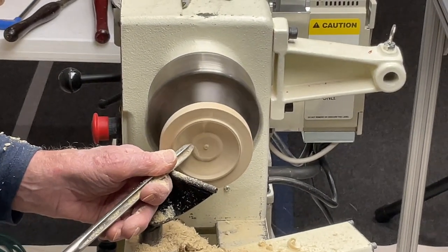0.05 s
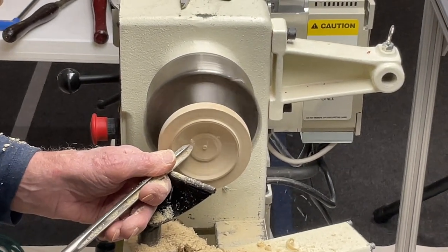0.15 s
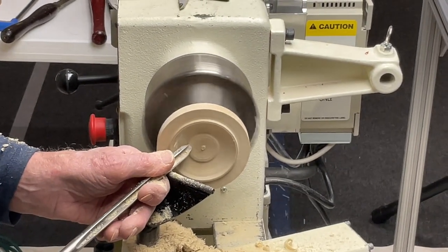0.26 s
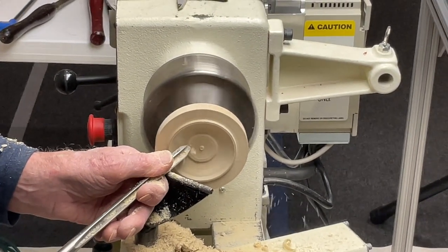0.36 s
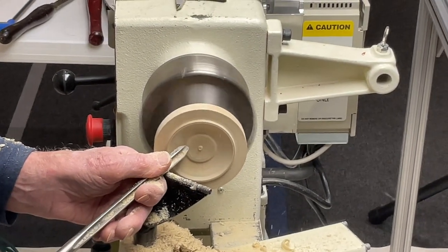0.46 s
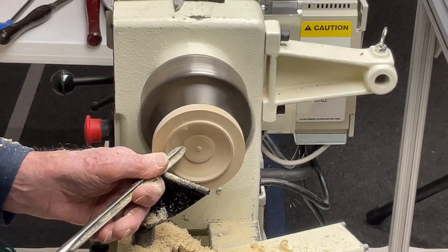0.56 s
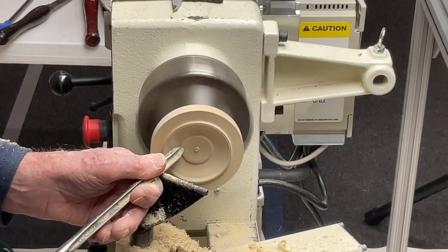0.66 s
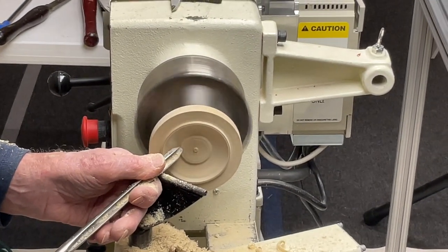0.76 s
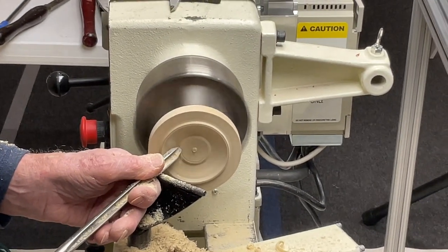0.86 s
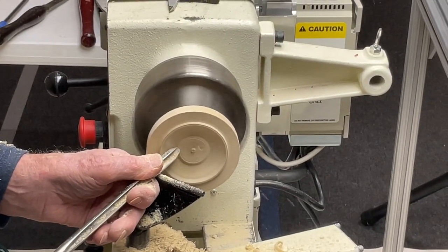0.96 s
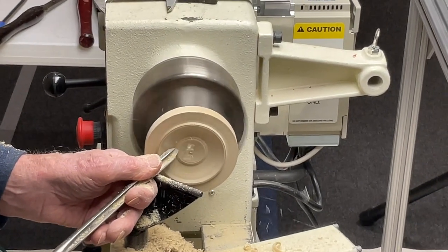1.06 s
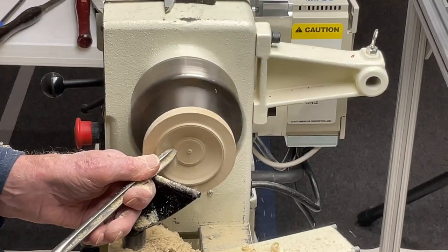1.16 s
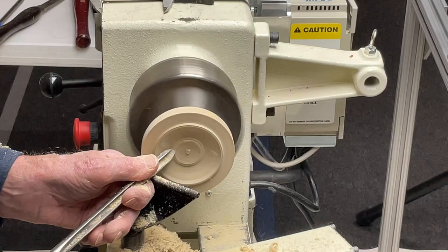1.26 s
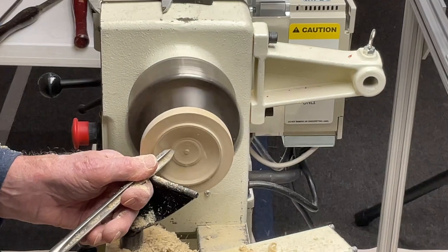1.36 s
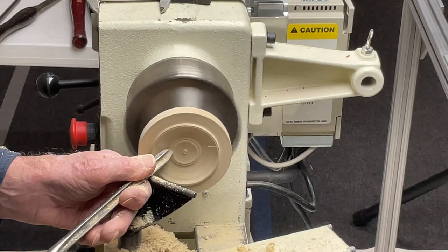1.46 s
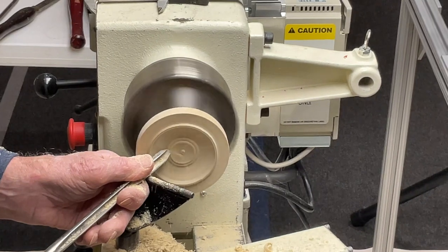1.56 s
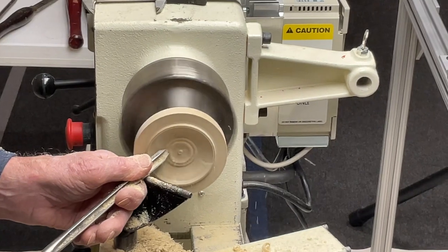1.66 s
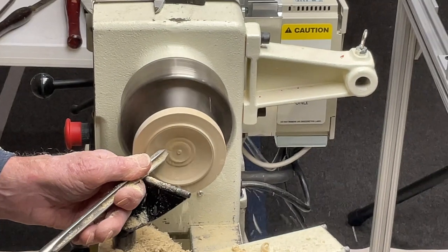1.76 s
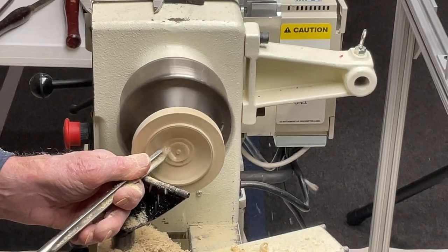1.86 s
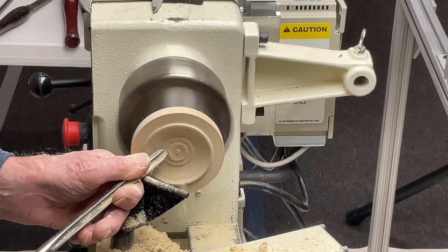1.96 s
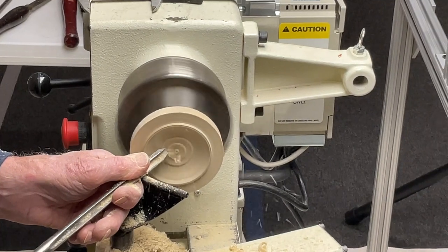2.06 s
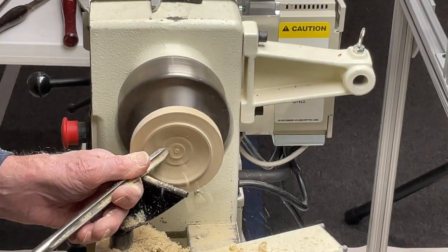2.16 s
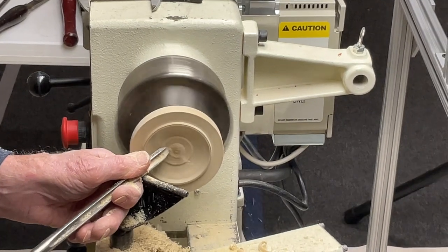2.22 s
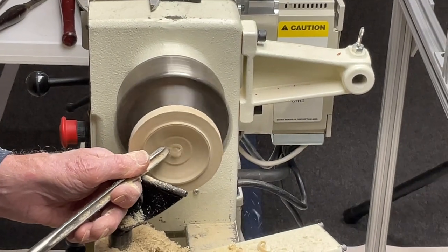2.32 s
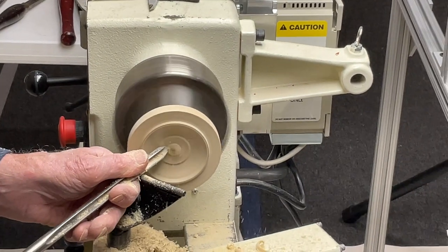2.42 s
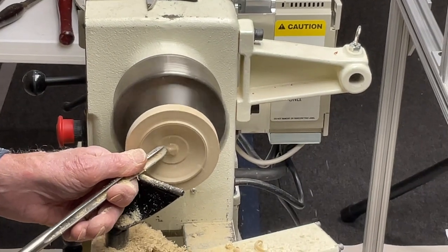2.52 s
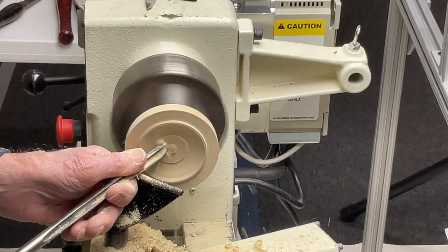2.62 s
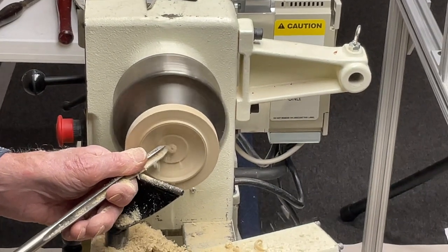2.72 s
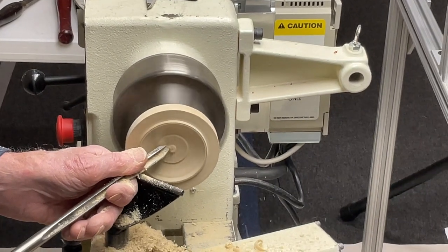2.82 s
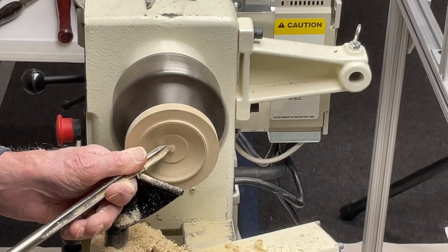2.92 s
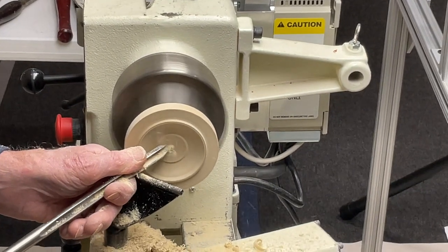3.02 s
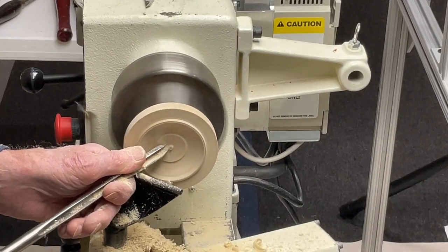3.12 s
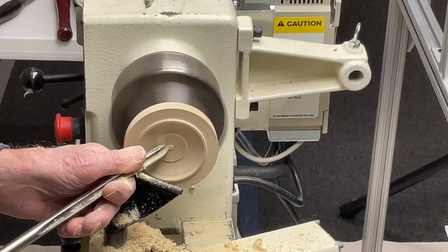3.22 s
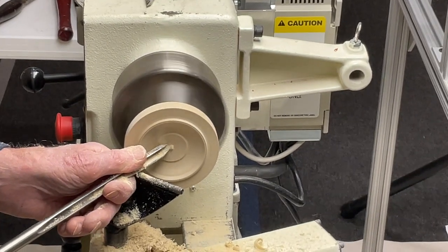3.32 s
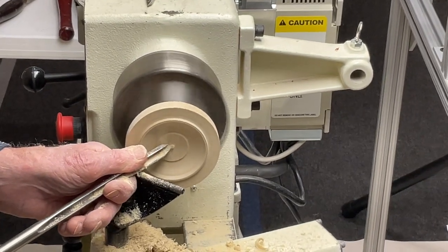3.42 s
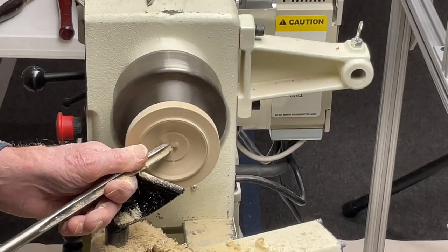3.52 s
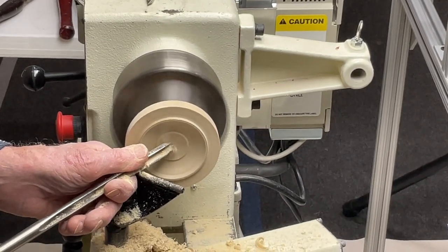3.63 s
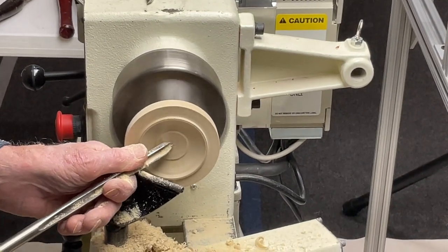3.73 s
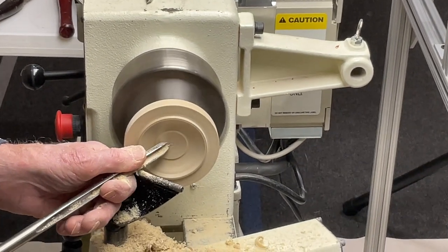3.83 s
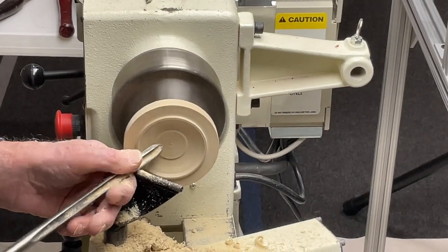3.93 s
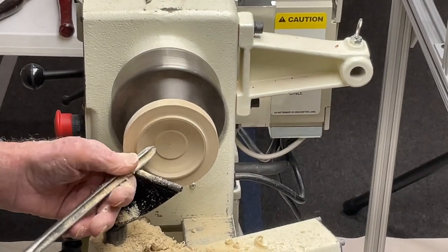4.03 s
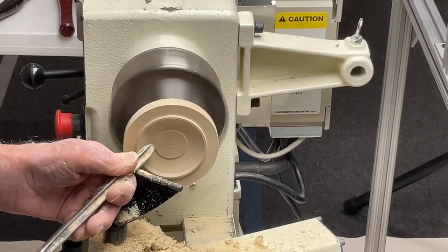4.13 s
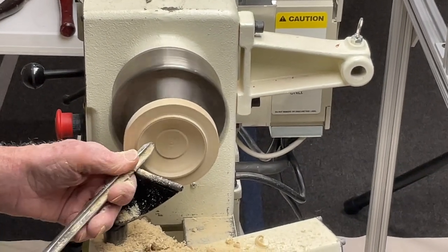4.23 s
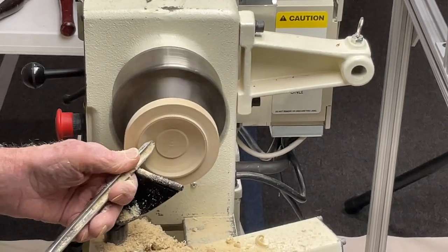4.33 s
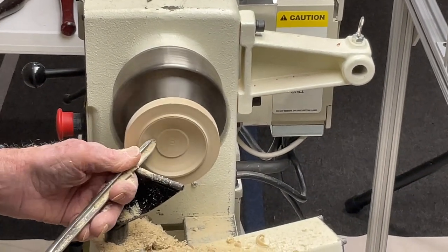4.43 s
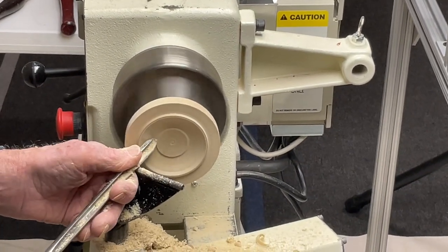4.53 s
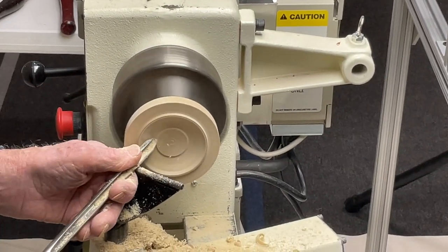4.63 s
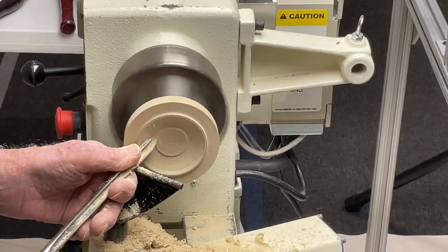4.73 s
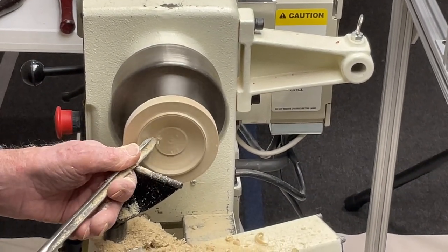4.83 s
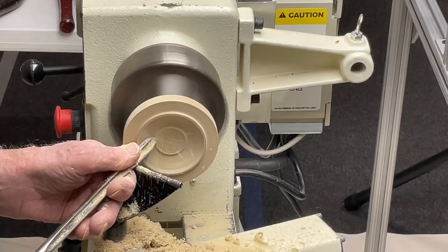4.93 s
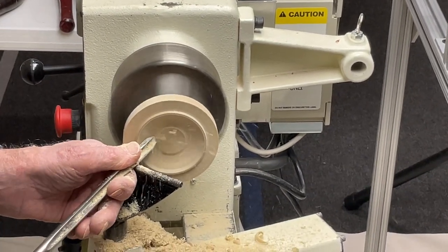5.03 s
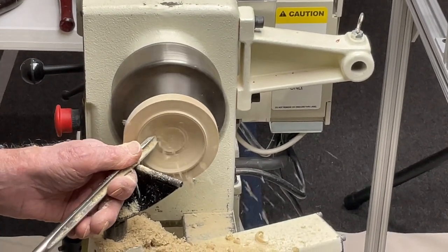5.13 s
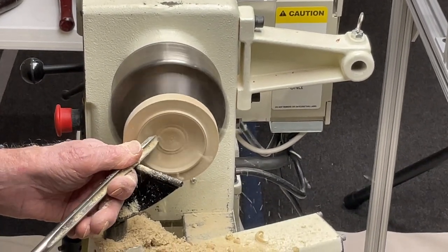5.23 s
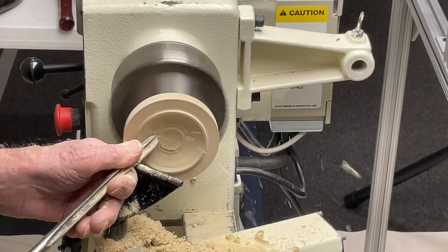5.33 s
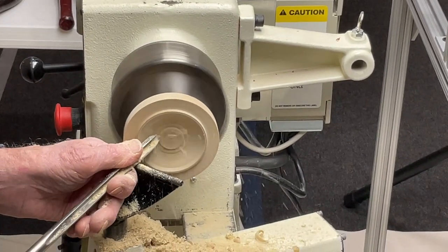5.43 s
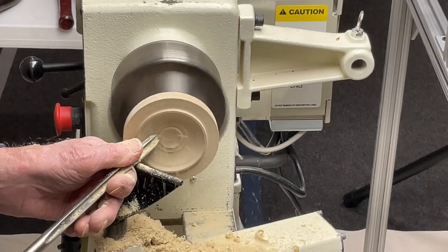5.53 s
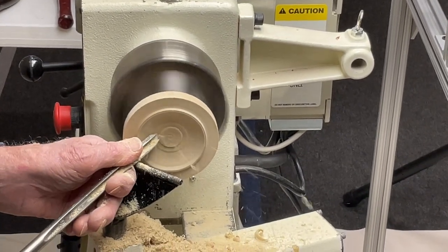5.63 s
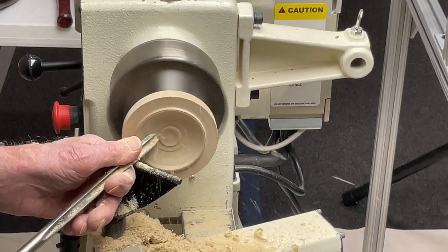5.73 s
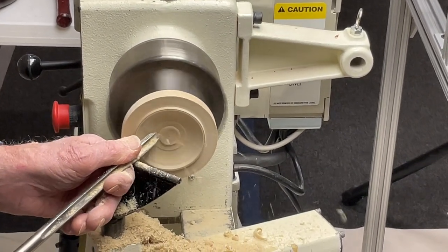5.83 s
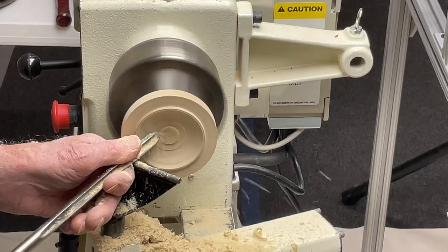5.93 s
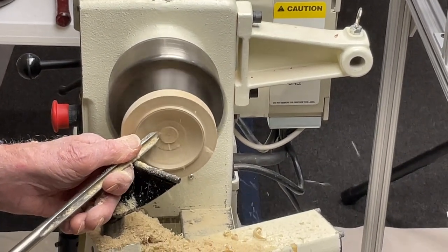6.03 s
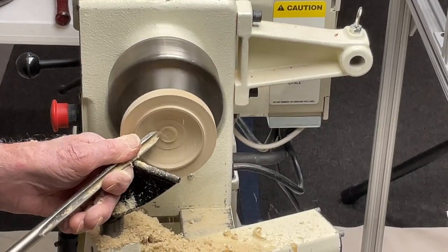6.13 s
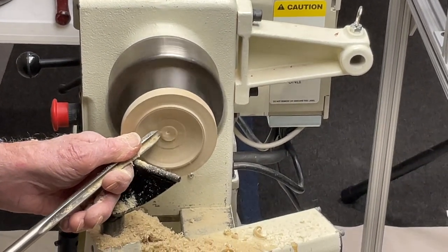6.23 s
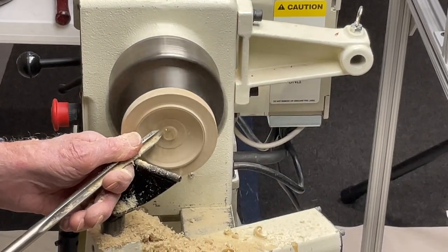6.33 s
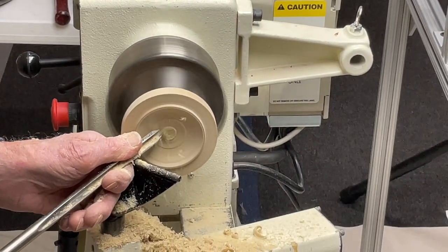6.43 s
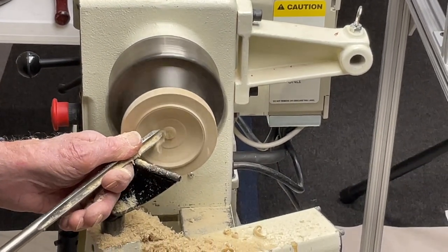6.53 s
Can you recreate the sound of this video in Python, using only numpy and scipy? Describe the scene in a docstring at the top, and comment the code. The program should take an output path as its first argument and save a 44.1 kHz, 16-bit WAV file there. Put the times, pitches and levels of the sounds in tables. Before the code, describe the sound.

Close to a small lathe in a dry workshop, a steady motor whine around 1 kHz and a soft fan rush run throughout, with a very faint high whistle. From 0 to about 0.4 s a gouge scrapes the spinning disc with a bright, metallic, rapidly pulsing squeak, about fifty bites a second, then lifts. At 0.84 s it re-enters abruptly with a brief judder; hiss and squeal continue while a woody tearing growl swells around 1.6-2.3 s and the motor labours. From 2.5 s the cut thins and fades unevenly, with low jolts and small ticks around 3.2-3.5 s. A soft low knock with a tiny bounce comes at 3.93 s, then mostly idle machine. At 4.5 s the third pass bites: a ringing judder near 4.9 s, then the loudest, roughest tearing, chatter and growl, surging from 5.2 to 6.2 s and easing slightly by 6.57 s, still cutting.

```python
"""Close to a small lathe in a workshop: a steel gouge is already cutting a spinning wooden disc and soon eases off.
A long second pass follows; as it fades the tool ticks on the wood, then knocks on its rest before a third, deep pass.
Snapping fibres, thickest where end grain comes round twice a turn, ring gouge, disc and headstock; hard spots of grain
make the gouge squeak. The motor whines underneath all along and labours with the cut, beside the rush of its fan."""
import sys
import numpy as np
from scipy import signal
from scipy.fft import rfft, irfft, next_fast_len
from scipy.io import wavfile
from scipy.ndimage import uniform_filter1d

SR = 44100
rng = np.random.default_rng(int(sys.argv[2]) if len(sys.argv) > 2 else 0)


def unload_audio(sound):
    """Save the sound as a 16-bit wav file, at the path given as the first command line argument."""
    columns = np.transpose(np.atleast_2d(sound))
    # keep every value between -1 and 1, then stretch to whole-number steps
    steps = np.round(np.clip(columns, -1, 1) * 32767)
    wavfile.write(sys.argv[1], SR, steps.astype(np.int16))


N = 289737

# All dB in the tables are levels before the small trims where the layers are mixed.
# Speed of the disc. Each row: time in seconds, spindle speed in turns per second.
SPINDLE_SPEED = [(0, 25.3), (1.7, 25.28), (2.4, 25.19), (3.2, 25.29), (6.57, 25.28)]
# Resonances of gouge and wood. Each row: centre in Hz, width in Hz, level when rubbed in dB, when cutting in dB.
GOUGE_MODES = [(1796, 450, -13, -15), (2243, 184, 6, -7.5), (2533, 260, 9.5, -1), (2860, 375, 8, 3.5),
               (3226, 150, -3, -2), (3508, 320, 8, -3.5), (3962, 297, 2, -6.5), (4514, 170, -47, -6),
               (4830, 420, -60, -12), (5740, 860, -9.5, -8), (6750, 725, -3.5, -9), (7870, 940, -16, -13),
               (8580, 1300, -77, -18.5), (9555, 280, -47.5, -11.5), (11280, 1480, -15.5, -20.5),
               (13030, 700, -11.5, -15), (14200, 500, -26.5, -25), (15600, 1600, -71.5, -22.5)]
# The gouge's loose bending modes. Each row: centre in Hz, width in Hz, level in dB.
BENDING_MODES = [(1714, 93, -7), (1811, 89, 2.5), (1842, 248, 4), (1910, 130, -11)]
# Resonances of the disc in its chuck, the two lowest first. Each row: centre in Hz, width in Hz, level in dB.
DISC_MODES = [(297.7, 56, -3), (472.5, 112, 0.5), (635, 170, -4), (744, 158, -1), (970, 290, -4),
              (1061, 60, 3.5), (1340, 500, -7.5), (1580, 330, -2)]
# Modes of the gouge that sing at each bite. Each row: pitch in Hz, wander in Hz, level in dB, lag in turns,
# change in a deep cut in dB, length of the ring as a factor, level at the second and at the third hard spot in dB.
SQUEAK_MODES = [(2520, 60, -4, .03, 2, 1.3, -3, -12), (3300, 90, -1, .04, -3, 1, -4, -16),
                (3540, 80, 5.3, .04, -3.8, 1, -2.5, -18), (5830, 130, 1.5, -.02, 0, .75, 0, -9),
                (6900, 110, -.5, -.04, 1, .75, 0, -5), (12600, 200, -10.5, 0, -1.5, 1.1, -2, -14)]
# Hard spots of grain round the disc. Each row: place in turns, half length in turns,
# share of the bite's delay that it follows.
GRAIN_SPOTS = [(-.005, .075, .3), (.45, .075, 1.2), (.73, .06, 0)]
# How hard each of those spots scrapes: one level in dB for each.
SPOT_SCRAPE_DB = [0, -2, -20]
# Where the edge sits on the disc shifts the bite. Each row: time in seconds, delay in turns.
BITE_DELAY = [(3.8, 0), (4.5, .15), (4.9, .15), (5.05, .02), (5.7, 0)]
# Passes of the gouge. Each row: edge fully in at (s), eases off at (s), out of the wood at (s), bevel rubbing in dB,
# shaving hiss in dB, shaving thins from (s), thinning in dB/s, chatter in dB, chatter dies from (s),
# rumble in dB, rumble full at (s), rumble fades from (s).
GOUGE_PASSES = [(-0.1, 0.337, 0.49, -35.5, -43, 0.018, 31.5, -53, 0.02, -69.5, 0.02, 0.4),
                (0.838, 2.524, 3.75, -34.5, -42.5, 2.18, 37.5, -33, 2.466, -41, 1.82, 2.5),
                (4.498, 6.2, 11, -32.5, -40, 5.93, 19.5, -29.5, 6.23, -47.5, 6, 7.5)]
# Depth of cut, one curve for each pass. Each row: time in seconds, level of the tearing in the disc in dB.
CUT_DEPTH = [
    [(0.0, -60), (0.266, -64.5), (0.8, -70)],
    [(0.85, -69), (1.1, -48.5), (1.28, -41.5), (1.6, -37.5), (1.7, -36), (1.97, -34), (2.43, -41.5),
     (2.85, -51.5), (3.55, -61), (3.79, -77), (3.85, -84)],
    [(4.45, -96), (4.53, -65), (4.85, -45), (4.98, -35), (5.14, -38.5), (5.18, -33), (5.29, -42),
     (5.52, -30), (5.64, -29.5), (5.77, -35.5), (5.84, -29.5), (5.95, -43), (6.02, -28.5), (6.1, -39.5),
     (6.19, -35), (6.24, -44.5), (6.41, -38.5), (6.57, -51)],
]
# The disc's low growl, one curve for each of the two deep passes. Each row: time in seconds, level in dB.
GROWL_LEVEL = [
    [(0.85, -75), (1.21, -58), (1.62, -50), (1.65, -38.5), (1.73, -43.5), (2.13, -39), (2.3, -52.5),
     (2.39, -45), (2.4, -52), (3.3, -64.5)],
    [(4.55, -70), (4.83, -58), (4.86, -48), (5.36, -43.5), (5.44, -38.5), (5.78, -42.5), (5.81, -34.5),
     (6.3, -46.5), (6.38, -38), (6.55, -49.5)],
]
# The edge digs in and jolts the headstock. Each row: centre in seconds, half length in seconds, level in dB.
HEADSTOCK_JOLTS = [(0.393, 0.028, -55), (0.969, 0.019, -50.5), (1.256, 0.026, -53), (1.414, 0.074, -49),
                   (1.654, 0.046, -41), (2.203, 0.05, -38), (2.62, 0.04, -55), (2.78, 0.056, -47),
                   (2.912, 0.032, -41.5), (3.176, 0.089, -46), (3.44, 0.02, -42.5), (3.525, 0.034, -42),
                   (3.62, 0.15, -54.5), (4.065, 0.033, -64.5), (4.963, 0.046, -56), (5.125, 0.033, -43),
                   (5.23, 0.071, -45), (5.423, 0.09, -55), (6.54, 0.031, -36.5)]
# The gouge's chatter flares up. Each row: centre in seconds, half length in seconds, level in dB.
CHATTER_FLARES = [(5.046, 0.068, -40), (5.154, 0.016, -25)]
# The gouge judders as it enters a cut. Each row: strongest at (s), level in dB, rise in dB/s, fall in dB/s.
ENTRY_JUDDERS = [(0.9, -40.5, 297, 11), (4.885, -24, 54.5, 85)]
# The edge catches (+) or skips (-) for a moment. Each row: centre in seconds, half length in seconds, change in dB.
EDGE_CATCHES = [(0.385, 0.0076, 8.5), (0.868, 0.0075, -2), (2.717, 0.02, 0.5), (2.776, 0.014, 2),
                (2.68, 0.041, 0.5), (2.805, 0.008, 0.5), (2.858, 0.0067, 2.5), (2.947, 0.017, 3.5),
                (3.03, 0.024, 0.5), (3.16, 0.015, -3), (3.28, 0.025, -8), (5.076, 0.17, 2),
                (5.137, 0.0059, -6), (5.185, 0.0052, -5.5)]
# The edge grazes the wood. Each row: centre in seconds, half length in seconds, level in dB.
GRAZES = [(0.245, 0.0026, -27), (0.841, 0.0048, -28.5), (0.882, 0.0025, -27), (2.82, 0.0025, -36),
          (3.177, 0.0035, -52.5), (3.3163, 0.0049, -38), (3.334, 0.0043, -39), (3.356, 0.01, -44),
          (3.4, 0.037, -54.5), (3.493, 0.0059, -38), (3.522, 0.025, -59)]
# The gouge is set down on the tool rest. Each row: time in seconds, level in dB.
REST_KNOCKS = [(3.9297, -29), (3.952, -43)]
# What the tool rest rings with. Each row: centre in Hz, width in Hz, level in dB.
REST_MODES = [(175, 120, -2), (326, 110, -8.5), (503, 135, 2.5), (645, 140, -8), (1900, 300, 1)]
# Colour of the headstock. Each row: frequency in Hz, level in dB.
HEADSTOCK_COLOUR = [(25, -37), (50, -31), (75, -21), (100, -2.5), (130, -4.5), (165, 1), (215, 3.5),
                    (300, -3.5), (450, -21.5), (900, -44.5), (2500, -50.5), (7000, -75)]
# Motor tones, each played at the nearest multiple of the shaft rate. Each row: frequency in Hz, level in dB.
MOTOR_TONES = [(333.8, -72.5), (759.0, -77), (963.6, -77.5), (1023, -74), (1055, -54.5), (1082, -58.5),
               (1114, -76.5), (1174, -64), (1206, -65), (1276, -78.5), (1324, -65), (1357, -70),
               (1416, -69.5), (1443, -60), (1475, -75), (1567, -83), (1642, -69), (1755, -71)]
# The load on the motor surges for a moment. Each row: centre in seconds, half length in seconds, rise in dB.
LOAD_SURGES = [(1.35, 0.14, 1.5), (1.79, 0.08, 14), (2.17, 0.08, 12), (5.06, 0.023, 5), (5.7, 0.16, 14)]
# The speed controller's whistle. Each row: frequency in Hz, level in dB.
CONTROLLER_TONES = [(8608, -93), (9932, -82.5), (10051, -82), (10174, -81), (11133, -86.5), (11256, -97),
                    (11375, -84.5)]
# Colour of the idling machine. Each row: frequency in Hz, level in dB.
IDLE_COLOUR = [(30, -32), (100, -4), (170, -6), (330, -1.5), (780, -1.5), (1300, 3), (1800, -8.5),
               (2400, -9), (4400, -17), (7500, -29), (12000, -27.5), (15000, -43)]
# Phase between the two microphone ports. Each row: frequency in Hz, lead of the left in radians.
PORT_LEAD = [(200, 0), (430, -.2), (800, .7), (1250, .7), (2000, -1.3), (2400, -2.45), (2700, -3.0),
             (2980, -3.28), (3400, -4.7), (3800, -5.7), (4400, -6.15), (5250, -5.5), (6300, -6.15),
             (7300, -5.1), (8400, -6.28), (11000, -6.28), (12600, -6.65), (15600, -6.4)]
# Level between the two microphone ports. Each row: frequency in Hz, left minus right in dB.
PORT_LEVEL = [(380, -0.5), (700, 2), (1300, 2), (1800, 4), (2400, 0.3), (2850, 0)]

T = np.arange(N) / SR
SIZE = 2 * next_fast_len(N // 2 + 8192)  # transform length, with room for the tails
FREQ = np.maximum(np.fft.rfftfreq(SIZE, 1 / SR), 1)

FIRST_END_GRAIN_S = 0.0087
ATTACK_DB_PER_S, CHATTER_BUILD_S, CHATTER_FADE_DB_PER_S = 1092.5, 0.14, 35.5
RUB_BUILD = 0.78  # share of the chatter's slow build-up that the rubbing follows
RUMBLE_RISE_DB_PER_S, RUMBLE_FADE_DB_PER_S = 33, 29
# the hand lets go slowly at first, then faster: fall until the edge is out, and the power of that curve
LIFT_DB, LIFT_POWER = 43, 1.22
# nearer the centre the tearing gets duller and the cut loses leverage on the motor:
# time from rim to centre, dulling on the way (dB per octave), share of leverage lost
TRAVEL_S, DULLING_DB, LEVERAGE_LOSS = 1.17, 11.5, 0.39
JUDDER_HZ = 1860
TICK_TILT_DB, TICK_GRIT_DB = -12.5, -7  # slope of the chirp per octave, grit against chirp
KNOCK_SOFT_HZ = 1000  # the soft contact excites little above this
MOTOR_HZ = 30.11  # shaft turns per second
# depth at which the motor runs free, dB of load per dB of depth, share by which the load wavers
FREE_RUN_DB, LOAD_SLOPE, LOAD_WAVER = -73, 0.63, 0.18
FULL_LOAD_DB = 15  # ceiling before the surges and the waver
IDLE_DB = -63.5
DIP_HZ, DIP_WIDTH_HZ = 2840, 510  # centre and width of a dip in the colour of the reflections
TOP_HZ = 15800


def cutting():
    """Bevel, shaving, chatter and judder sound at the edge; a deep cut shakes disc and headstock too."""
    rub_db, hiss_db, chatter_db, rumble_db = passes()
    tear_db = cut_depth()
    growl_db = np.interp(T, *np.vstack(GROWL_LEVEL).T)
    turn = np.cumsum(np.interp(T, *np.transpose(SPINDLE_SPEED))) / SR - FIRST_END_GRAIN_S * SPINDLE_SPEED[0][1]
    late = turn - bite_lag()
    contact = np.clip((rub_db + 82.5) / 12, 0, 1)
    # a light cut only catches the high spots; a deep one stays in the wood all the way round
    depth = np.clip((tear_db + 67.0) / 18, 0, 1)
    shaving = np.clip((hiss_db + 61.5) / 6, 0, 1) * depth
    bite = hard_spots(turn, SPOT_SCRAPE_DB, between_db=-4 + 4 * shaving, ragged_db=1.2, stretch=1.2)
    drag = end_grain(late - .3, twice_db=0.1, once_db=0.5, ragged_db=1.4)
    snapping = drag * (fibres(1100, 3.1, 0.31) + apart(0.32))

    edge = bevel_rub(bite, turn, shaving) * undb(rub_db - 1.44)
    edge = edge + shaving_hiss(bite) * undb(hiss_db - 3.0)
    edge = edge + gouge_chatter(late, depth) * undb(chatter_db - 3.0)
    edge = edge + judder(late - .03)
    disc = disc_tear(snapping) * undb(tear_db - 1.0) + contact * disc_growl(snapping) * undb(growl_db + 1.5)
    wood_and_tool = (contact * edge + disc) * undb(bumps(EDGE_CATCHES))
    return wood_and_tool + headstock_rumble(drag) * undb(rumble_db - 2.0)


def bevel_rub(bite, turn, shaving):
    """Friction excites the rubbed gouge; a lightly riding bevel sings more than it scrapes."""
    band = (5500, 7200)
    modes = np.array(GOUGE_MODES, float)[:, [0, 1, 2]]
    scrape = unit(ring(bite * fibres(9000, 1.7, 0.84), resonances(modes)), band)
    scrape = unit(shifting(scrape, [2300, 2850, 3500, 6000, 9000, 12500], depth_db=2.6, rate=50), band)
    song = unit(squeaks(turn, shaving, ragged_db=1.5), band)
    singing = .85 - .08 * shaving  # share of the power
    return np.sqrt(1 - singing) * scrape + np.sqrt(singing) * song


def squeaks(turn, shaving, ragged_db):
    """Each bite sets the gouge's modes singing briefly, each at its own moment, pitch and strength."""
    out = 0
    for hz, wander_hz, db, lag, deep_db, stretch, *later_db in SQUEAK_MODES:
        catch = hard_spots(turn - lag - .018 * walk(40), [0, *later_db], between_db=-21 + 5 * shaving,
                           ragged_db=1.4, stretch=stretch)
        level_db = db + deep_db * shaving + ragged_db * walk(75)
        out = out + catch * undb(level_db) * sing(hz, wander_hz)
    return out


def sing(hz, wander_hz):
    """One mode of the gouge, its pitch wandering with the contact."""
    pitch_hz = hz + wander_hz * (.8 * walk(90) + .5 * walk(500))
    return np.sin(2 * np.pi * np.cumsum(pitch_hz) / SR)


def shaving_hiss(bite):
    """Fibres snapping as the shaving comes off ring the cutting gouge."""
    band = (8200, 9700)
    modes = np.array(GOUGE_MODES, float)[:, [0, 1, 3]]
    hiss = unit(ring(bite * fibres(6000, 2.8, 0.79), resonances(modes)), band)
    return unit(shifting(hiss, [2500, 4500, 7000, 9500, 13000], depth_db=1.7, rate=70), band)


def gouge_chatter(late, depth):
    """The gouge springs back after each bite and rings its loose bending modes."""
    rebound = end_grain(late - .12, twice_db=7.5 - 5 * depth, once_db=.5, ragged_db=1.6)
    push = rebound * (fibres(2500, 0.9, 0.83) + apart(0.33))
    return unit(ring(push, resonances(BENDING_MODES)), band=(1700, 2000))


def judder(turn):
    """The gouge bounces in the cut: its main bending mode rings in one clean burst after each bite."""
    levels = [db - rise * np.maximum(s - T, 0) - fall * np.maximum(T - s, 0) for s, db, rise, fall in ENTRY_JUDDERS]
    bursts = end_grain(turn, twice_db=10, once_db=2, ragged_db=1, sharp=.05)
    hz = JUDDER_HZ + 12 * walk(110) + 22 * walk(600)
    tone = np.sqrt(2) * np.sin(2 * np.pi * np.cumsum(hz) / SR)
    return undb(np.max(levels, axis=0)) * bursts * tone


def disc_tear(snapping):
    """Fibres tear and ring the disc's upper modes, duller towards its centre."""
    slope_db = DULLING_DB * (.52 - inward())
    tear = ring(snapping, resonances(DISC_MODES[2:]) * no_bass())
    tear = shifting(tear, [600, 800, 1060, 1500], depth_db=2.8, rate=14, slope_db=slope_db)
    return unit(tear, band=(420, 950))


def disc_growl(snapping):
    """The disc's two lowest modes growl with a strength of their own."""
    growl = ring(snapping, resonances(DISC_MODES[:2]) * no_bass())
    return unit(shifting(growl, [285, 470], depth_db=2.8, rate=14), band=(420, 950))


def no_bass():
    """The small disc radiates hardly any bass."""
    return 1 / (1 + (210 / FREQ) ** 4)


def headstock_rumble(drag):
    """The drag of the cut shakes the headstock, which answers in the bass."""
    shake = drag * (fibres(300, 2.7, 0.43) + apart(0.1))
    return unit(ring(shake, undb(along(HEADSTOCK_COLOUR))), band=(80, 260))


def hard_spots(turn, strengths_db, between_db, ragged_db, stretch=1):
    """Pressure on the edge: each hard spot strikes it quickly and lets go more slowly, never twice alike."""
    bite, shift = undb(between_db), bite_lag()
    for (place, half, follows), db in zip(GRAIN_SPOTS, strengths_db):
        off = (turn - place - follows * shift + .5) % 1 - .5  # turns from the spot
        width = half * np.where(off < 0, .7, 1.25 * stretch)
        bite = bite + undb(db + ragged_db * walk(50)) * np.exp(-(off / width) ** 2)
    return bite / np.sqrt(uniform_filter1d(bite ** 2, SR // 8))


def end_grain(turn, twice_db, once_db, ragged_db, sharp=0.61):
    """Bite of the edge: end grain comes round twice a turn, one side harder, never quite alike."""
    angle = 2 * np.pi * turn
    both_db = twice_db * (np.cos(2 * angle) + sharp * np.cos(4 * angle))
    bite = undb(both_db + once_db * np.cos(angle) + ragged_db * walk(170))
    return bite / np.sqrt(uniform_filter1d(bite ** 2, SR // 8))


def fibres(per_s, spread_db, smooth):
    """Snapping fibres of uneven size over a share of smooth friction."""
    size = undb(spread_db * np.minimum(rng.exponential(size=N), 4))
    snaps = (rng.random(N) < per_s / SR) * rng.choice([-1, 1], N) * size
    return snaps / np.std(snaps) + smooth * rng.standard_normal(N)


def shifting(x, centres_hz, depth_db, rate, slope_db=0):
    """The contact point wanders, so each resonance group flares and fades alone; slope (dB/octave) tilts them."""
    spectrum, out = rfft(x, SIZE), 0
    for hz, weights in zip(centres_hz, np.eye(len(centres_hz))):
        group = irfft(spectrum * np.interp(FREQ, centres_hz, weights))[..., :N]
        gain_db = depth_db * walk(rate) + slope_db * np.log2(hz / centres_hz[0])
        out = out + group * undb(gain_db)
    return out


def passes():
    """Levels in dB of bevel, shaving, chatter and rumble: each builds up, holds and falls away."""
    layers = []
    for (touch_s, ease_s, out_s, rub_db, hiss_db, thin_s, thinning,
         chatter_db, dies_s, rumble_db, full_s, fades_s) in GOUGE_PASSES:
        lift_db = -LIFT_DB * np.maximum((T - ease_s) / (out_s - ease_s), 0) ** LIFT_POWER
        build_db = 20 * np.log10(1 - .9 * np.exp(-np.maximum(T - touch_s, 0) / CHATTER_BUILD_S))
        shake_db = -RUMBLE_RISE_DB_PER_S * np.maximum(full_s - T, 0)
        layers.append([rub_db + stroke(touch_s, ease_s, 0) + lift_db + RUB_BUILD * build_db,
                       hiss_db + np.minimum(stroke(touch_s, thin_s, thinning), 1.64 * lift_db),
                       chatter_db + build_db + stroke(touch_s, dies_s, CHATTER_FADE_DB_PER_S),
                       rumble_db + shake_db + stroke(touch_s, fades_s, RUMBLE_FADE_DB_PER_S)])
    rub, hiss, chatter, rumble = np.max(layers, axis=0)
    return rub, hiss, swells(chatter, CHATTER_FLARES), swells(rumble, HEADSTOCK_JOLTS)


def stroke(touch_s, ease_s, fall_db_per_s):
    """Envelope in dB: the edge goes in quickly, holds, then falls away."""
    return -ATTACK_DB_PER_S * np.maximum(touch_s - T, 0) - fall_db_per_s * np.maximum(T - ease_s, 0)


def cut_depth():
    """Depth of cut through all passes, as a level in dB."""
    return np.interp(T, *np.vstack(CUT_DEPTH).T)


def bite_lag():
    """Delay of the bite in turns."""
    return np.interp(T, *np.transpose(BITE_DELAY))


def inward():
    """How far the edge has travelled in the current pass: 0 at the rim, 1 at the centre."""
    share = np.zeros(N)
    for touch_s, *_ in GOUGE_PASSES:
        share = np.where(T >= touch_s, (T - touch_s) / TRAVEL_S, share)
    return uniform_filter1d(np.clip(share, 0, 1), size=SR // 20)


def ticks():
    """The edge grazes the wood: a brief chirp of the gouge's modes with a little grit."""
    band = (3000, 15000)
    touch = sum(undb(db) * np.exp(-((T - s) / half_s) ** 2) for s, half_s, db in GRAZES)
    chirp = 0
    for hz, wander_hz, db, *_ in SQUEAK_MODES[2:]:
        tilt_db = TICK_TILT_DB * np.log2(hz / SQUEAK_MODES[2][0])
        chirp = chirp + undb(db + tilt_db + 4.5 * walk(120)) * sing(hz, wander_hz)
    body = resonances(np.array(GOUGE_MODES, float)[:, [0, 1, 3]])
    grit = ring(fibres(5400, 2.2, 0.8), body * FREQ / (FREQ + 6000))
    return touch * (unit(chirp, band) + undb(TICK_GRIT_DB) * unit(grit, band))


def knocks():
    """The gouge lands softly on the tool rest and bounces once; each push rings the rest."""
    push = np.zeros(N)
    for s, db in REST_KNOCKS:
        push[int(s * SR)] = undb(db)
    body = resonances(REST_MODES) / (1 + (90 / FREQ) ** 2) / (1 + (FREQ / KNOCK_SOFT_HZ) ** 4)
    return ring(push, body) / abs(ring(np.ones(1), body)).max()


def motor():
    """Shaft harmonics beat once a turn, evenly when idle; under load the main whine swells and all tones waver."""
    load_db = LOAD_SLOPE * (1 - LEVERAGE_LOSS * inward()) * np.maximum(cut_depth() - FREE_RUN_DB, -8)
    load_db = np.minimum(load_db, FULL_LOAD_DB) + bumps(LOAD_SURGES)
    waver_db = .7 + 2.3 * np.clip((load_db - 5) / 12, 0, 1)
    load_db = load_db * (1 + LOAD_WAVER * walk(7))
    angle = 2 * np.pi * np.cumsum(MOTOR_HZ * (1 + 0.0002 * walk(7.1))) / SR
    out = 0
    for hz, db in MOTOR_TONES:
        main = np.exp(-((hz - 1060) / 60) ** 2)  # near 1 for the main whine
        swell_db = (0.57 + 0.15 * main) * load_db + 2.7 * main - 3.5
        # each tone away from the main whine starts at its own phase; all drift slightly
        start = (1 - main) ** 2 * rng.uniform(-np.pi, np.pi)
        drift = .07 * waver_db * walk(15)
        tone = np.sin(np.round(hz / MOTOR_HZ) * angle + start + drift)
        out = out + undb(db + swell_db + waver_db * walk(12)) * tone
    return out


def controller():
    """The speed controller whistles high up on steady tones that waver in level and phase."""
    out = 0
    for hz, db in CONTROLLER_TONES:
        level = undb(db + 1.5 + 2.2 * walk(8.1))
        out = out + level * np.sin(2 * np.pi * hz * T + 0.885 * walk(40))
    return out


def fan():
    """Soft rush of the motor's fan and bearings: coloured noise, partly different at each port."""
    air = rng.standard_normal(N) + apart(0.16)
    rush = unit(ring(air, undb(along(IDLE_COLOUR))), band=(450, 950))
    return undb(IDLE_DB - 6.0 + 0.56 * walk(7.6)) * rush


def workshop(x, t60_s, wet_db, treble_hz):
    """Dense reflections from bench and walls: decaying noise, different at each port, weak in the deep bass."""
    tails = rng.standard_normal((2, N)) * undb(-60 * T / t60_s) * (T > .002)
    tails /= np.sqrt(np.sum(tails ** 2, axis=1, keepdims=True))
    colour = FREQ / np.hypot(FREQ, 450) / (1 + (FREQ / treble_hz) ** 2)
    colour = colour * (1 - .85 * np.exp(-((FREQ - DIP_HZ) / DIP_WIDTH_HZ) ** 2))
    return undb(wet_db) * irfft(rfft(x, SIZE) * rfft(tails, SIZE) * colour)[:, :N]


def ports(x):
    """The direct sound reaches the two ports with a different phase and level."""
    half = .5j * along(PORT_LEAD)
    tilt = undb(along(PORT_LEVEL) / 2)
    return irfft(rfft(x, SIZE) * np.array([tilt * np.exp(half), np.exp(-half) / tilt]))[:, :N]


def apart(share):
    """The part of a wide source that each port hears on its own."""
    return share * rng.standard_normal((2, N))


def undb(db):
    """Decibels to gain."""
    return 10 ** (np.asarray(db) / 20)


def along(points):
    """Join (Hz, value) points on a log-frequency axis."""
    hz, value = np.transpose(points)
    return np.interp(np.log(FREQ), np.log(hz), value)


def resonances(modes):
    """Gain of a set of steep (Hz, width, dB) resonances, added in power."""
    return np.sqrt(sum((undb(db) / (1 + (2 * (FREQ - hz) / width) ** 2)) ** 2 for hz, width, db in modes))


def ring(x, gain):
    """Pass x through the causal minimum-phase filter that has this gain."""
    cepstrum = irfft(np.log(gain + 1e-7))
    cepstrum[1:SIZE // 2] *= 2  # fold the past onto the future
    cepstrum[SIZE // 2 + 1:] = 0
    return irfft(rfft(x, SIZE) * np.exp(rfft(cepstrum)))[..., :N]


def unit(x, band):
    """Scale x to rms 1 within a band (Hz, Hz)."""
    inside = (FREQ > band[0]) & (FREQ < band[1])
    power = 2 * np.sum(abs(rfft(x, SIZE)[..., inside]) ** 2) / SIZE / x.size
    return x / np.sqrt(power)


def walk(rate):
    """Random levels held 1 / rate s and slewed twice; spread near 1."""
    k = max(int(SR / rate), 1)
    steps = np.repeat(rng.standard_normal(N // k + 1), k)
    return 1.37 * uniform_filter1d(uniform_filter1d(steps, k), k)[:N]


def swells(base_db, events):
    """A level in dB with short bell-shaped swells on top, added in power."""
    power = undb(base_db) ** 2
    for s, half_s, db in events:
        power = power + (undb(db) * np.exp(-((T - s) / half_s) ** 2)) ** 2
    return 10 * np.log10(power + 1e-14)


def bumps(events):
    """Brief bell-shaped rises and dips, in dB."""
    return sum(db * np.exp(-((T - s) / half_s) ** 2) for s, half_s, db in events)


def scene():
    """Tool and machine, heard close up in a small workshop."""
    lathe = cutting() + ticks() + knocks() + motor() + controller() + fan()
    return ports(lathe) + workshop(lathe, t60_s=0.079, wet_db=-5.0, treble_hz=5040)


def record(dry):
    """The recorder cuts the top."""
    return signal.sosfilt(signal.ellip(10, .2, 80, TOP_HZ, fs=SR, output="sos"), dry)


dry = scene()
out = record(dry)
unload_audio(out)
```